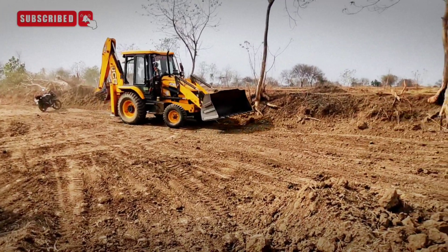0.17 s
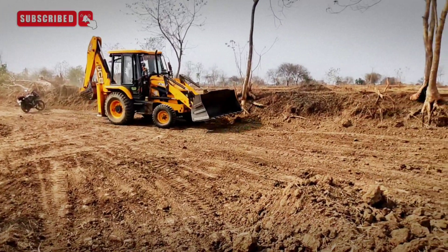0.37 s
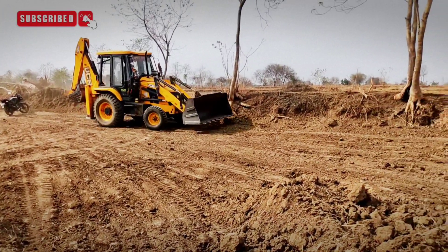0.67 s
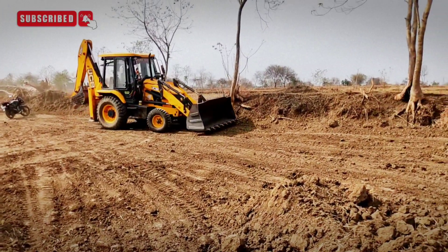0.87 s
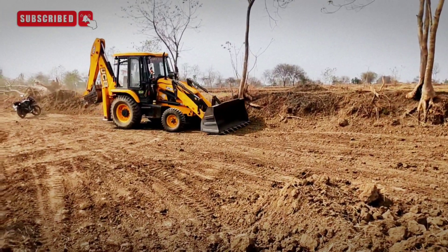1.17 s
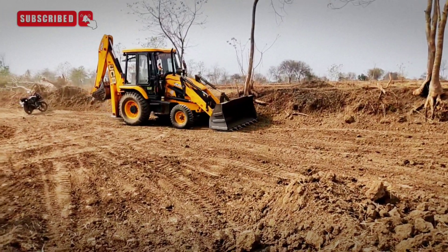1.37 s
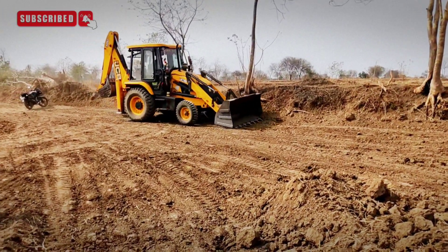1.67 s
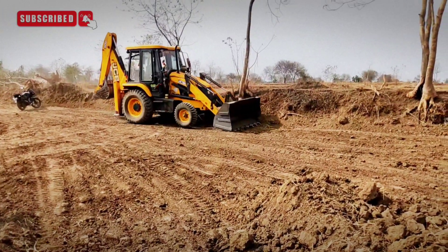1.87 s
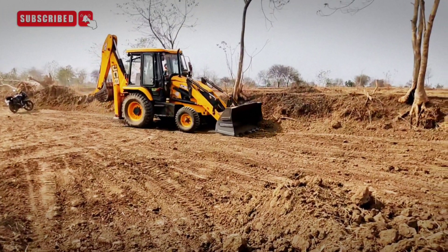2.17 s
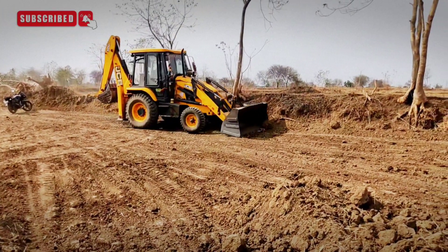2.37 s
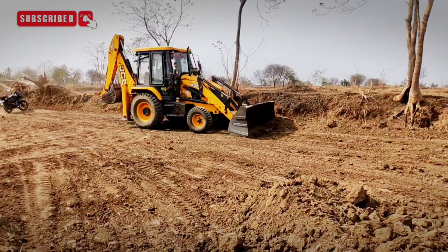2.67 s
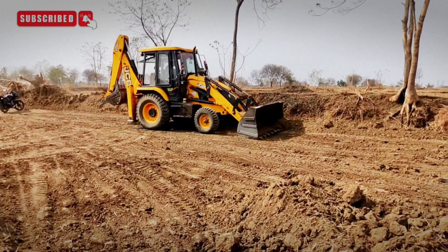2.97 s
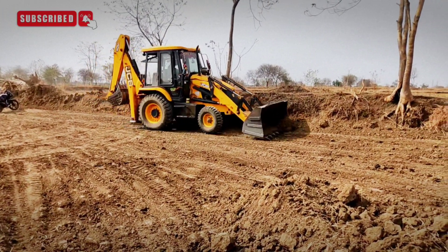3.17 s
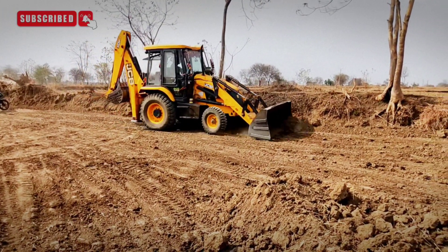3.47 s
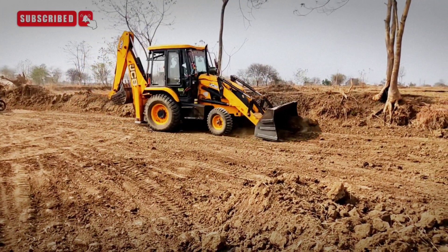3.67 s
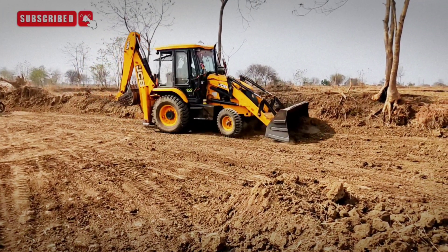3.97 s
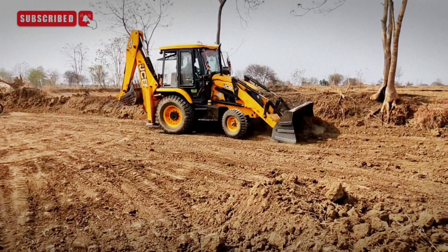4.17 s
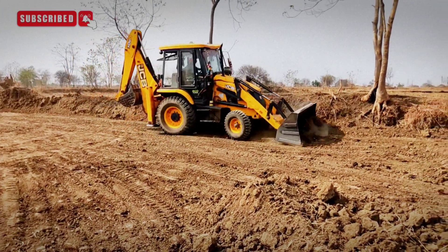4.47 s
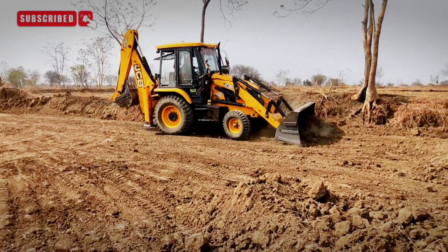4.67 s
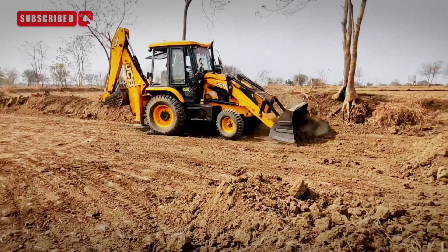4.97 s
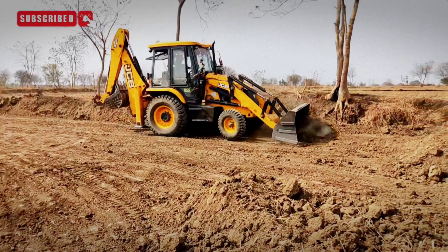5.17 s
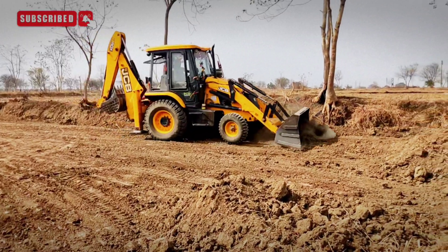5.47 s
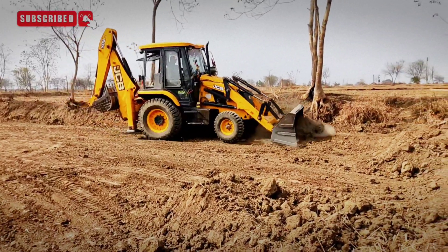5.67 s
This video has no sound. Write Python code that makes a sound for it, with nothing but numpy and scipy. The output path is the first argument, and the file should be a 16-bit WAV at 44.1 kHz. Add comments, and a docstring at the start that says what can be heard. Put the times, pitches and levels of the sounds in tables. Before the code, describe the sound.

A wide, shrill insect hiss, strongest around 4 to 8 kHz, flickers throughout in a dry open field. Across it, a four-cylinder diesel idles low and unevenly from 0 to 1.4 s, while wind rumbles and soft low puffs hit the left microphone, mostly between 0.5 and 1.2 s. At about 1.5 s a heavy steel clank lands and the engine revs up, becoming a louder, knocking, throbbing pull by 2 s. A stone crack and gritty bang come at 2.2 s, with brief gusts from then on. Short hollow hood rings pepper the engine. Another strong clank with grit hits near 3.65 s, then soil scrape and loose-tin clatter thicken; further bangs come around 4.05 and 4.4 s. The engine keeps climbing, intake hiss swelling, to its fastest near 5.4 s, and is still working hard at 5.8 s. The stereo sound is dry, with only a short dull ground reflection.

```python
"""Dry field, two microphone ports: insects hiss all around, as noise flickering in narrow bands.
A backhoe loader's four-cylinder diesel idles across the field while wind puffs at the left port.
From about 1.5 s it revs up and pulls under load: exhaust sines, and noise thrown by each firing.
Bangs, scrapes and some engine knocks are bursts of noise through steel and grit; hard knocks ring the
hood. From 2.2 s brief gusts swell the wind rumble, and the engine is fastest near the end."""
import sys
import numpy as np
from scipy import signal
from scipy.fft import rfft, irfft, next_fast_len
from scipy.io import wavfile
from scipy.ndimage import uniform_filter1d

SR = 44100
rng = np.random.default_rng(int(sys.argv[2]) if len(sys.argv) > 2 else 0)


def transcribe(u):
    """Save the signal u as a 16-bit wav file named by the first command-line argument.

    u: samples, shape (n,) or (channels, n), limited to [-1, 1]; the rate is SR.
    q: integer samples, one column per channel.
    """
    v = np.clip(np.atleast_2d(u).T, -1, 1)
    q = np.round(v * 32767).astype(np.int16)
    wavfile.write(sys.argv[1], SR, q)


N = 255780
T = np.arange(N) / SR
FFT_SIZE = next_fast_len(N + SR // 2)
HZ = np.fft.rfftfreq(FFT_SIZE, 1 / SR)

# Levels in dB are those of each layer where it is made, before the ground and the ports.


def gain_of(db):
    """Amplitude factor of a level in dB."""
    return 10 ** (np.asarray(db) / 20)


def evened(x):
    """Scales x to rms 1 along its last axis."""
    return x / np.sqrt(np.mean(x ** 2, -1, keepdims=True) + 1e-20)


def read(points, hz):
    """Reads a curve of (Hz, value) points along log frequency."""
    f, value = np.transpose(points)
    return np.interp(np.log(hz + 1), np.log(f + 1), value)


def columns(rows):
    """Every column after the first, the time in s, drawn out over the scene."""
    s, *rest = np.transpose(rows)
    return [np.interp(T, s, column) for column in rest]


def filtered(x, response):
    """Multiplies the spectrum of x by a response given at HZ."""
    return irfft(rfft(x, FFT_SIZE) * response, FFT_SIZE)[..., :N]


def colour(x, points):
    """Gives x a spectrum, at rms 1."""
    return evened(filtered(x, gain_of(read(points, HZ))))


def ring(x, modes):
    """A bank of steep-sided resonances with alternating signs, at rms 1."""
    response = 0
    for k, (hz, width, db) in enumerate(modes):
        peak = gain_of(db) / np.sqrt(width)
        response = response + (-1) ** k * peak / (1 + 1j * (HZ - hz) / width) ** 2
    return evened(filtered(x, response))


def glide(x, hz, width):
    """Shifts the curve hz to zero, smooths twice and shifts back: a moving resonance at rms 1."""
    turn = np.exp(2j * np.pi * np.cumsum(hz) / SR)
    r = np.exp(-2 * np.pi * width / SR)
    return evened((turn * signal.lfilter([1], [1, -2 * r, r * r], x / turn)).real)


def drift(rate_hz, shape=()):
    """Slow chance: low-passed noise of rms 1."""
    return evened(signal.lfilter(*signal.butter(2, rate_hz, fs=SR), rng.standard_normal(shape + (N,))))


def smoothed(x, first, second):
    """Moving averages over the first two axes."""
    return uniform_filter1d(uniform_filter1d(x, size=first, axis=0), size=second, axis=1)


def patchy(x, depth_db, streak_db):
    """Uneven noise: patches of the spectrum rise and fall, narrow bands sink for a while."""
    hz, t, z = signal.stft(x, SR, nperseg=1024, noverlap=768)
    patches, streaks = rng.standard_normal((2, len(hz), len(t)))
    patches = evened(smoothed(patches, 8, 14))
    streaks = evened(smoothed(streaks, 2, 12))
    db = depth_db * np.minimum(patches, .7) + streak_db * np.minimum(streaks, .8)
    return evened(signal.istft(z * gain_of(db), SR, nperseg=1024, noverlap=768)[1][:, :N])


# Spectrum of the insect hiss: [f/Hz, relative level/dB per Hz]
INSECT_SPECTRUM = [(2240, -87), (3800, -19), (4250, -21), (4370, -15), (4650, -2.5), (4920, 5), (5540, 2.5),
                   (6210, -2.5), (6510, -4.5), (7170, -8), (8100, -7), (9310, -26.5), (9800, -40.5),
                   (11000, -31), (12700, -37), (14000, -37), (21600, -120)]
# Swell of the chorus, raised 3 dB when played: [t/s, relative level/dB]
CHORUS_LEVEL = [(0.0, -34.5), (0.79, -35), (1.06, -33.5), (1.81, -33), (5.8, -35)]


def insects():
    """Wide insect hiss flickering in narrow bands, unlike at the two ports, with drifting patches."""
    frames, hz = N // 512 + 5, np.fft.rfftfreq(2048, 1 / SR)
    a, b, patches, streaks = rng.standard_normal((4, len(hz), frames, 2))
    streaks = evened(smoothed(streaks, 3, 6))
    patches = evened(smoothed(patches, 10, 5))
    db = read(INSECT_SPECTRUM, hz)[:, None, None]
    db = db + 3.2 * np.minimum(patches, .8) + 9.1 * np.minimum(streaks, 1.2)
    z = ((a + 1j * b) * gain_of(db)).transpose(2, 0, 1)
    hiss = evened(signal.istft(z, nperseg=2048, noverlap=1536)[1][:, :N])
    return gain_of(columns(CHORUS_LEVEL)[0] + 3.0 + 0.53 * drift(48, (2,))) * hiss


# Spectrum of the wind rumble: [f/Hz, level/dB]
WIND_SPECTRUM = [(4, -14), (12, -.5), (25, -1.5), (45, -8), (90, -13), (200, -20), (400, -32), (800, -50),
                 (2500, -100)]
# Changing level of the wind rumble at the left port: [t/s, level/dB]
RUMBLE_LEVEL = [(0.0, -47), (0.19, -27), (0.31, -38), (0.48, -26), (0.86, -29), (1.0, -25), (1.24, -35),
                (1.32, -48), (1.48, -25.5), (1.87, -57), (4.6, -69), (5.02, -41), (5.8, -52)]
# Brief gusts added to that level: [t/s of the peak, peak level/dB]
GUST_PEAKS = [(2.201, -32), (2.411, -25), (2.65, -31), (2.861, -30), (3.28, -30), (3.359, -30), (3.83, -34),
              (4.33, -28), (4.619, -30)]
GUST_DB_PER_S, SHELTER_DB = 220, -8.5  # rise and fall of a gust; the right port is sheltered


def wind_rumble():
    """Lumpy low noise of moving air, mostly unrelated at the two ports."""
    level = gain_of(columns(RUMBLE_LEVEL)[0])
    for s, db in GUST_PEAKS:
        level = level + gain_of(db - GUST_DB_PER_S * abs(T - s))
    left, right = colour(rng.standard_normal((2, N)), WIND_SPECTRUM)
    right = gain_of(SHELTER_DB) * (right + 0.13 * left)
    return np.array([left, right]) * level * gain_of(2.0 * drift(1.6, (2,)))


# Puffs, each peaking 12 ms after its time: [t/s, envelope level/dB, pitch f/Hz]
PUFF_EVENTS = [(0.547, -24, 77.6), (0.573, -28.5, 154.9), (0.641, -20, 206), (0.772, -29, 106),
               (0.809, -31, 167.9), (0.906, -20, 154), (1.024, -23, 180), (1.122, -26, 177),
               (3.378, -28, 88.9), (3.838, -40, 102.4), (4.268, -29, 62.6)]
# Spectrum of the air noise in a puff: [f/Hz, level/dB]
PUFF_SPECTRUM = [(40, 1), (120, -6), (300, -4), (600, -15), (1100, -32), (2000, -83), (5000, -92)]
PUFF_MS = 7.1  # from the peak to 3.8 dB below it


def wind_puffs():
    """Short puffs at the left port: a low sine and air noise under one bell-shaped swell."""
    out = np.zeros((2, N))
    air = colour(rng.standard_normal(N), PUFF_SPECTRUM)
    for s, db, hz in PUFF_EVENTS:
        near = slice(round(s * SR) - 1000, round(s * SR) + 2000)
        u = T[near] - s - .012
        swell = gain_of(db - 3.8 * (u * 1000 / PUFF_MS) ** 2)
        out[0, near] += swell * (1.23 * np.sin(2 * np.pi * hz * u) + 1.04 * air[near])
    return out


SHORTER_PER_DB, LONGEST_MS = 0.12, 380


def lasting(t60_ms, db):
    """The harder the blow, the sooner it is over; t60_ms holds at -16.5 dB."""
    return min(t60_ms * np.exp(-SHORTER_PER_DB * (db + 16.5)), LONGEST_MS)


# Bangs, scrapes and some engine knocks; grit, clank and thud peak 1, 8 and 14 ms after the time:
# [t/s, thud level/dB, clank level/dB, grit level/dB, rise/ms]
BLOWS = [(0.149, -31.5, -20, -39, 29), (1.127, -38, -13, -32, 24), (1.525, -19.5, 2, -21.5, 13.4),
         (1.88, -31, -27, -25, 12), (2.201, -21, -7, -12.5, 2.7), (2.214, -29, -21.5, -25, 27),
         (2.309, -31.5, -22, -43, 94), (2.40, -50, -36, -24.5, 7.7), (2.641, -40.5, -9, -33.5, 62),
         (3.575, -30, -16, -20, 11.4), (3.658, -19, 2.5, -11, 28), (3.872, -49, -35.5, -22, 7),
         (3.93, -42, -7, -29.5, 9.9), (4.051, -27, -3, -23, 26), (4.101, -48, -45, -40.5, 16),
         (4.381, -27, -18, -12, 9.4), (4.648, -26.5, -45, -22, 8.7), (4.87, -38.5, -25, -32, 38),
         (5.271, -32, -53, -32, 8.8)]
# A stone cracks on the edge: [t/s of the peak, peak level/dB, rise/ms]
STONE_CRACKS = [(2.1935, -6.5, .6), (3.645, -14, 7), (4.368, -17, 1), (4.374, -14, 2), (4.382, -16, 1)]
# Resonances of the steel: [f/Hz, width/Hz, level/dB]
STEEL_MODES = [(182.2, 16, -3), (264, 77, -4.5), (330, 51, 0.5), (411.2, 11.6, 2.5), (547, 52, -4),
               (738, 102, 2.5), (1083, 100, -10), (1370, 220, -13.5), (1871, 46, -6.5), (2170, 120, -10),
               (2526, 82, -14), (3420, 47, -23), (3640, 45, -23), (3930, 32, -13), (5050, 92, -29),
               (7350, 80, -23)]
# Spectra of the soil grit and of a cracking stone: [f/Hz, level/dB]
GRIT_SPECTRUM = [(500, -80), (1500, 2.5), (1900, 4), (2200, 0.5), (2600, -1), (3050, -1.5), (3600, -3),
                 (4300, -2), (5200, -3), (6700, -5.5), (7750, 8.5), (8700, -15.5), (9300, -5),
                 (10500, -29.5), (13000, -23.5), (15500, -65)]
CRACK_SPECTRUM = [(1500, -31), (3000, -18), (4000, 0), (5000, -6), (6500, 7.5), (7800, 0.5), (9000, -6),
                  (10500, -9.5), (13000, -27), (15500, -54)]
THUD_T60_MS, STEEL_T60_MS, GRIT_T60_MS, CRACK_T60_MS = 132, 790, 192, 23  # only the crack's is fixed
GRAINS_PER_S, GRAIN_SPREAD_DB = 4000, 2.5  # the grit is single grains of uneven size


def blow_levels():
    """Envelopes of thud, clank, grit and crack: a curved rise, then a straight fall in dB."""
    levels = np.zeros((4, N + SR))
    ms = np.arange(-SR // 10, SR // 2) * 1000 / SR
    parts = [(3, s, db, rise_ms, CRACK_T60_MS) for s, db, rise_ms in STONE_CRACKS]
    for s, thud_db, clank_db, grit_db, rise_ms in BLOWS:
        parts += [(0, s + .014, thud_db, rise_ms, lasting(THUD_T60_MS, thud_db)),
                  (1, s + .008, clank_db, rise_ms, lasting(STEEL_T60_MS, clank_db)),
                  (2, s + .001, grit_db, rise_ms, lasting(GRIT_T60_MS, grit_db))]
    for layer, s, db, rise_ms, t60_ms in parts:
        start = round(s * SR) - SR // 10
        drop_db = np.where(ms < 0, 5.1 * (ms / rise_ms) ** 2, 60 * ms / t60_ms)
        levels[layer, start:start + len(ms)] += gain_of(db - drop_db)
    return levels[:, None, :N]


def bangs_and_scrapes():
    """Each blow is a spray of grit, then the clank and thud of steel: direct and scattered part."""
    thud_level, clank_level, grit_level, crack_level = blow_levels()
    a, b, c, d = rng.standard_normal((4, 2, N))
    grain_db = GRAIN_SPREAD_DB * np.minimum(rng.exponential(1, N), 4)
    grains = c * (rng.random(N) < GRAINS_PER_S / SR) * gain_of(grain_db)
    thud = a * thud_level
    rattle = (rng.random(N) < 2200 / SR) * gain_of(0.97 * drift(60))  # loose pins rattle in clusters
    clank = b * clank_level * rattle
    low = [mode for mode in STEEL_MODES if mode[0] < 600]
    high = [mode for mode in STEEL_MODES if mode[0] >= 600]
    out = np.std(thud) * ring(thud, low) + np.std(clank) * ring(clank, high)
    return out + grit_level * colour(grains, GRIT_SPECTRUM) + crack_level * colour(d, CRACK_SPECTRUM)


# The hood's strongest ring, mostly climbing as the machine turns: [t/s, f/Hz]
HOOD_PITCH = [(0, 904.7), (1.7, 952), (2.4, 974), (3, 964), (3.6, 985.3), (4.4, 992.5), (5.8, 1009)]
# Single hard knocks that ring the hood: [t/s of the start, envelope peak level/dB]
KNOCK_EVENTS = [(1.5, -16), (1.516, -16), (1.525, -21.5), (1.545, -14), (1.857, -24), (1.879, -18.5),
                (2.199, -20.5), (2.215, -12), (2.239, -20), (2.25, -15), (2.264, -32), (2.307, -17),
                (2.392, -17.5), (2.475, -24.5), (2.498, -19.5), (2.56, -16), (2.814, -22.5), (3.105, -18.5),
                (3.187, -21), (3.385, -16), (3.466, -19), (3.643, -35.5), (3.667, -12.5), (3.681, -19.5),
                (3.693, -14.5), (3.861, -14), (3.9, -18), (3.933, -27.5), (4.117, -15.5), (4.187, -18.5),
                (4.349, -20), (4.383, -11), (4.437, -14.5), (4.575, -28), (4.611, -14), (4.712, -13.5),
                (4.986, -21), (5.194, -33.5), (5.224, -32), (5.558, -32), (5.579, -17), (5.694, -27),
                (5.787, -21.5)]
RING_RISE_MS, RING_T60_MS = 0.67, 57
RING_SPREAD = .02  # each lands up to this fraction off the hood's pitch


def hard_knocks():
    """Each hard knock is one clean, brief ring of the hood: direct and scattered part."""
    out, hood, u = np.zeros((2, N + 2000)), columns(HOOD_PITCH)[0], T[:2000]
    shape = (1 - np.exp(-u * 1000 / RING_RISE_MS)) ** 2 * gain_of(-60 * u * 1000 / RING_T60_MS)
    shape = shape / shape.max()
    for s, db in KNOCK_EVENTS:
        start = round(s * SR)
        hz = hood[start] * (1 + RING_SPREAD * rng.uniform(-1, 1))
        phase = rng.random((2, 1))
        out[:, start:start + 2000] += gain_of(db) * shape * np.sin(2 * np.pi * (hz * u + phase))
    return out[:, :N]


# Hiss of the intake: [f/Hz, level/dB]
INTAKE_SPECTRUM = [(5500, 0.5), (7000, 10.5), (7750, 10.5), (8400, 8.5), (9300, -2.5), (10000, -81),
                   (12500, -22), (14400, -64), (14700, -85)]
INTAKE_TOP_DB, INTAKE_DB_PER_OCTAVE = -29, 34  # at top speed; the hiss follows speed


def intake(firing):
    """Intake hiss: patchy treble noise that swells with engine speed."""
    db = INTAKE_TOP_DB + INTAKE_DB_PER_OCTAVE * np.log2(firing / firing.max())
    hiss = patchy(colour(rng.standard_normal((2, N)), INTAKE_SPECTRUM), 1.3, 18)
    return gain_of(db + 3.64 * drift(13.5)) * hiss


# Broad clatter and soil scrape: [f/Hz, level/dB]
CLATTER_SPECTRUM = [(600, -11), (1300, 11), (1900, 12.5), (2600, 7.5), (3500, -3.5), (4500, -6),
                    (6000, -28), (9000, -67)]
# Loose panels ringing in the clatter: [f/Hz, width/Hz, level/dB]
TIN_MODES = [(1535, 14, -9), (1852, 34, 0.5), (2217, 43, -6.5), (2637, 26, -2.5), (3250, 17, -16),
             (3400, 15, -13.5), (3630, 35, -7.5), (3860, 30, -4.5), (7670, 31, -5.5)]
TIN_DB = -5  # against the broad clatter


def clatter(burst, clatter_db):
    """Noise pulsing with each firing shakes loose tin and scrapes the soil."""
    shaken = rng.standard_normal((2, N)) * (1 + burst)
    mix = colour(shaken, CLATTER_SPECTRUM) + gain_of(TIN_DB) * ring(shaken, TIN_MODES)
    return gain_of(clatter_db) * patchy(mix, 4.2, 9.3)


# Roar of the body: [f/Hz, level/dB]
ROAR_SPECTRUM = [(30, -8.5), (60, -8), (120, -8), (200, 0.5), (300, -5), (420, -0.5), (560, 5), (700, 3),
                 (1000, -39), (2000, -63), (6000, -100)]
ROAR_IDLE_DB, ROAR_PER_LOAD = -31.5, 0.74  # level at idle load; dB gained per dB of load
THUMP_DB = 5.5  # the strike of each firing in the roar


def roar(firing, burst, fires, load_db):
    """Each firing throws a burst of noise and a thump into the body."""
    db = ROAR_IDLE_DB + ROAR_PER_LOAD * load_db + 1.92 * drift(13)
    thumps = gain_of(THUMP_DB) * np.sqrt(SR / firing) / 10 * fires
    return gain_of(db) * colour(rng.standard_normal((2, N)) * (1 + burst) + thumps, ROAR_SPECTRUM)


# Resonances of the engine block: [f/Hz, width/Hz, level/dB]
BLOCK_MODES = [(774, 64, 5.5), (870, 22, -12.5), (1074, 27, -8.5)]
KNOCK_IDLE_DB, KNOCK_PER_LOAD = -34, 1.22  # drive at idle load; dB gained per dB of load
STRIKE_DB = 14.5  # every firing opens with one sharp strike, above its rattle
FIRING_SPREAD = .012  # each firing rings the hood a little off its pitch (fraction, rms)


def block_knock(count, burst, fires, load_db):
    """Combustion strikes and rattles the block, which rings along with the hood."""
    knock_db = KNOCK_IDLE_DB + KNOCK_PER_LOAD * load_db
    blows = gain_of(knock_db) * (burst + 1 / 2)  # the block never falls quite still
    strikes = gain_of(knock_db + STRIKE_DB) * fires
    noise = rng.standard_normal((2, N))
    drive = uniform_filter1d(uniform_filter1d(noise * blows + strikes, size=9), size=7)  # blunt blows
    hood_hz = columns(HOOD_PITCH)[0] * (1 + FIRING_SPREAD * rng.standard_normal(N)[count])
    block = ring(drive, BLOCK_MODES) + glide(drive, hood_hz, 58)
    return np.std(blows * noise[0]) * evened(block)


# Pipe response to the low tones, at top speed and idle load: [f/Hz, level/dB]
PIPE_RESPONSE = [(32, -44), (38, -38.5), (48, -43.5), (55, -38.5), (60, -36), (68, -52), (78, -41),
                 (92, -36), (110, -38), (120, -43.5), (142, -48), (165, -43), (180, -48.5)]
# Tones that come with speed: [multiple of the firing rate, level/dB at top speed]
UPPER_TONES = [(4, -36), (5, -46.5), (6, -36), (7, -34.5), (8, -41.5), (13, -34.5), (14, -38)]
TONE_PER_LOAD, TONE_DB_PER_OCTAVE = 0.65, 2.5  # dB per dB of load; dB per octave of speed
IDLE_WAVER = 1.45  # exponent: the tones waver more at low speed


def exhaust(firing, turns, load_db):
    """The low multiples of the firing rate pass the pipe, wavering in level and pitch."""
    speed = firing / firing.max()
    growth_db = TONE_PER_LOAD * load_db + TONE_DB_PER_OCTAVE * np.log2(speed)
    tones = [(k, read(PIPE_RESPONSE, k * firing) + growth_db) for k in range(1, 4)]
    tones += [(k, db + 80 * np.log10(speed)) for k, db in UPPER_TONES]
    uneven = turns + .006 * drift(12)
    out = np.zeros(N)
    for k, db in tones:
        waver_db = (0.5 + 0.39 * min(k, 7)) * speed ** -IDLE_WAVER * drift(21.0)
        out += np.sqrt(2) * gain_of(db + waver_db) * np.sin(2 * np.pi * (k * uneven + rng.random()))
    return out


# Course of the engine, with the clatter and soil scrape:
# [t/s, firing rate f/Hz, load level/dB above idle, clatter level/dB]
ENGINE_COURSE = [(0, 39.4, -3, -36.5), (.2, 33, 1.5, -39), (.5, 32, -4.5, -40.5), (.85, 34.4, 1.5, -41.5),
                 (1.08, 40.4, -2.5, -41), (1.22, 35.4, -3.5, -44), (1.34, 32.6, -4, -38.5),
                 (1.56, 37.7, 8, -34.5), (1.84, 47.6, 6, -38.5), (2.0, 48.2, 6.5, -34), (2.15, 46, 5, -32),
                 (2.45, 47, 7, -32), (2.8, 48.4, 5, -35.5), (3.3, 51.5, 5.5, -37), (3.62, 49.9, 6.5, -33),
                 (3.76, 49.4, 8.5, -28.5), (3.91, 53.4, 10, -35), (4.22, 55, 8.5, -31.5),
                 (4.59, 55.3, 9.5, -31), (5.44, 60.2, 7, -34), (5.8, 57.8, 7.5, -31)]
# Strength of the four cylinders, one knocking harder: [level/dB]
CYLINDER_LEVELS = [2, -1, 0, -1]
HARD_S = 2.56  # a moment when the hard cylinder fires


def engine():
    """Uneven firings drive block, body and tin; intake hiss follows speed; exhaust is direct only."""
    firing, load_db, clatter_db = columns(ENGINE_COURSE)
    turns = np.cumsum(firing) / SR  # one turn here is one firing
    turns = turns - turns[int(HARD_S * SR)] % 4 + 4
    count = turns.astype(int)
    strength = gain_of(np.take(CYLINDER_LEVELS, count % 4) + 1.85 * rng.standard_normal(N)[count])
    burst = strength * np.exp(-(turns % 1) / firing / .007)  # each combustion dies in a few ms
    fires = strength * np.diff(count, prepend=count[0])
    out = block_knock(count, burst, fires, load_db) + roar(firing, burst, fires, load_db)
    out += clatter(burst, clatter_db) + intake(firing)
    out[0] += exhaust(firing, turns, load_db)
    return out


# Lateness of the echo; the path over the soil changes as the machine moves: [t/s, delay/ms]
ECHO_DELAY = [(0, 0.86), (1.4, 0.79), (2.0, 0.79), (3.5, 0.77), (4.2, 0.79), (4.6, 0.75), (5.8, 0.81)]


def ground(x):
    """The soil returns a dull echo that cancels the low middle."""
    dull = filtered(x, .95 * np.exp(-(HZ / 1600) ** 4))
    late = T - columns(ECHO_DELAY)[0] / 1000
    return (x + np.array([np.interp(late, T, part) for part in dull])) / 2


# Phase by which the left port leads; negative is later: [f/Hz, phase/rad]
LEFT_LEAD = [(0, 0), (400, -.3), (600, -1), (700, -.1), (1000, -.3), (1300, -2), (1500, -3.2), (1800, -6.3),
             (2200, -9.4), (2600, -12.4), (3000, -15.7), (3300, -18.8), (3900, -19), (4300, -21),
             (9000, -46), (15000, -80)]
# Likeness of the two ports: [f/Hz, share from 0 to 1]
LIKENESS = [(60, 0.96), (450, 1), (620, 0.51), (850, 1), (1250, 0.5), (1500, 0.96), (1850, 0.38),
            (2200, 0.4), (2650, 0.95), (3100, 0.57), (3600, 0.72), (4300, 0.033), (9000, 0.29)]
# Left minus right: [f/Hz, level/dB]
LEFT_TILT = [(60, 2), (200, 0), (400, 6.5), (750, -1), (1150, 6), (1700, -1.5), (2400, 1.5), (4000, -0.5),
             (14000, -0.5)]


def ports(x):
    """The far, left port hears the direct part later, and a scattered part of its own."""
    same, tilt = np.clip(read(LIKENESS, HZ), 0, 1), gain_of(read(LEFT_TILT, HZ) / 2)
    direct = filtered(x[0], same * np.exp(1j * read(LEFT_LEAD, HZ)) * tilt)
    scattered = filtered(x[1], np.sqrt(1 - same ** 2) * tilt)
    return np.array([direct + scattered, filtered(x[0], 1 / tilt)])


def scene():
    """Insects and wind at the ports; the machine reaches them across the soil."""
    machine = bangs_and_scrapes() + hard_knocks() + engine()
    return insects() + wind_rumble() + wind_puffs() + ports(ground(machine))


# Narrow fixed dips in the treble and upper middle: [f/Hz, width/Hz, level/dB]
NARROW_DIPS = [(1510, 140, -2.5), (2165, 69, -5.5), (3086, 71, -24), (3817, 140, -9.5), (4090, 54, -17.5),
               (6740, 240, -7), (7900, 52, -12)]
EDGE_HZ = 14400  # upper band limit


def record(dry):
    """Narrow fixed dips in the treble and upper middle; then the band limit."""
    dips = sum(db * np.exp(-((HZ - hz) / width) ** 2) for hz, width, db in NARROW_DIPS)
    heard = filtered(dry, gain_of(dips))
    low_pass = signal.firwin(511, EDGE_HZ, window=("kaiser", 9), fs=SR)
    return signal.oaconvolve(heard, low_pass[None], "same")


dry = scene()
out = record(dry)
transcribe(out)
```